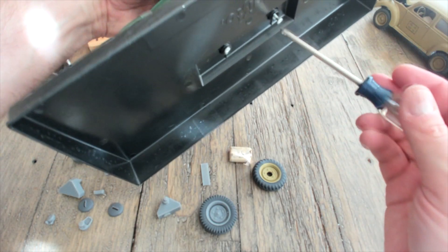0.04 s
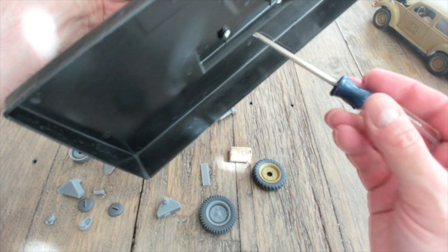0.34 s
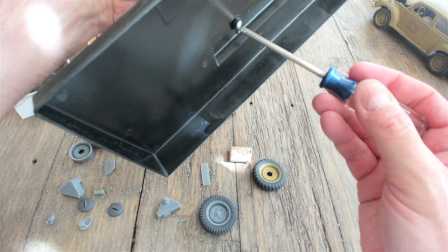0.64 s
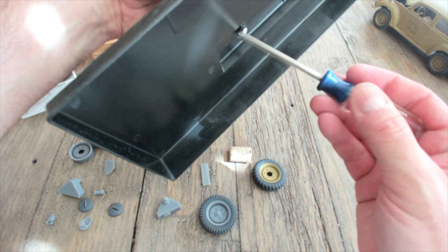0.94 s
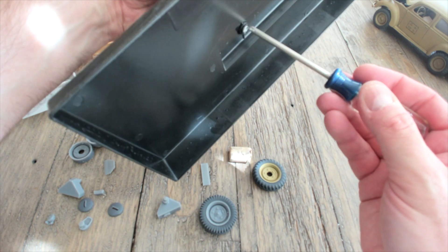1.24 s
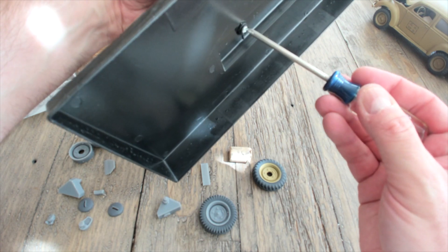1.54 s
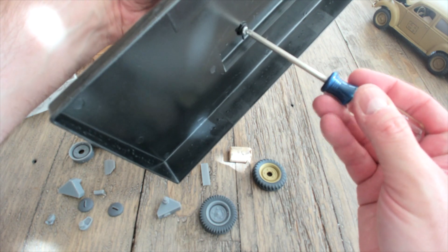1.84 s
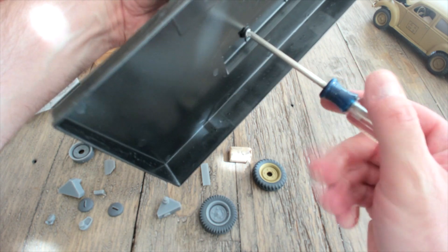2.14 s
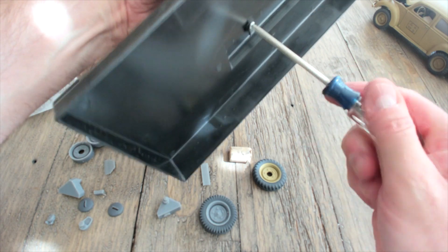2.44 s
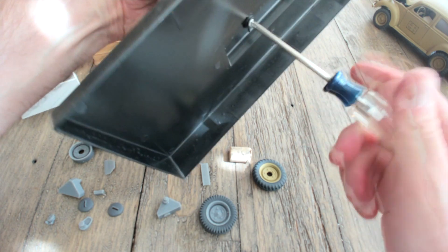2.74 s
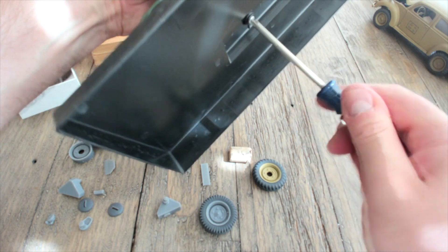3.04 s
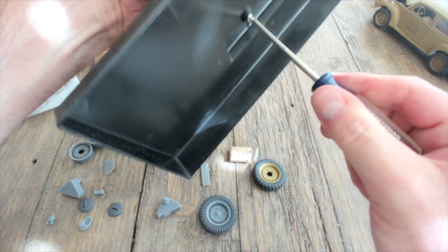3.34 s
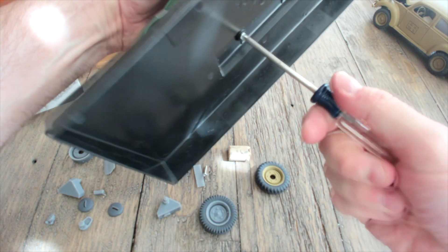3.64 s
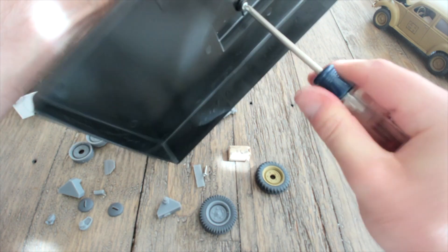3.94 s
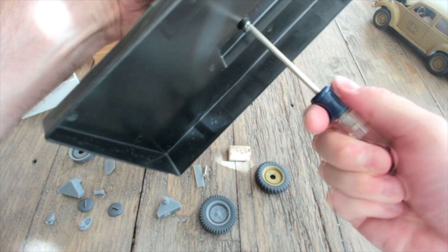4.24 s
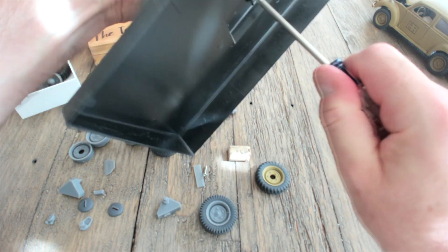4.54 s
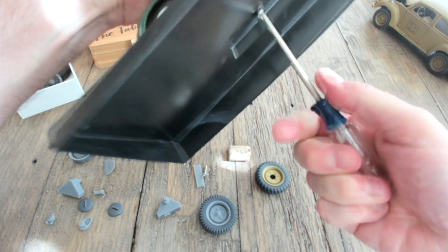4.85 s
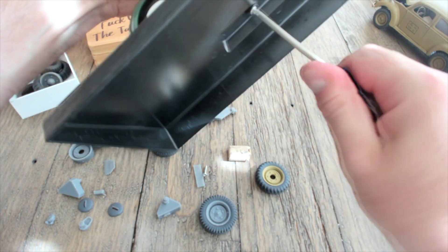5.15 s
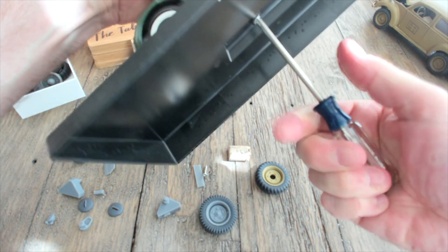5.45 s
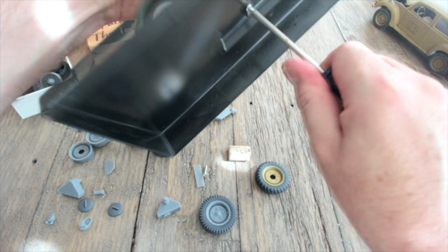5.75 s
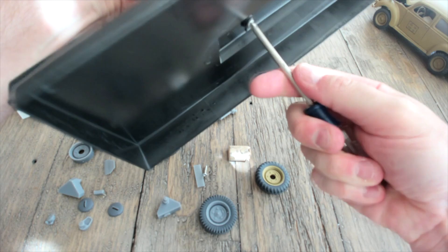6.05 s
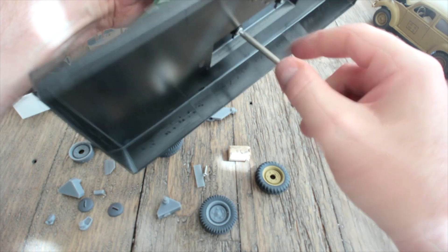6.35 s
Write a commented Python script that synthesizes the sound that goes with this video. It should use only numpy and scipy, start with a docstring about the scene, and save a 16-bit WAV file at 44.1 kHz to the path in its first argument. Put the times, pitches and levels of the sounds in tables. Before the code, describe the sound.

A small screwdriver backs a screw out of a hard plastic base, heard close in a quiet small room with slight reverberation. In the first second and a half there are faint metallic ticks and a few light, hollow plastic taps. Two firmer taps, at about 1.8 and 2.1 seconds, ring briefly in the shell. From around 2.2 seconds the screw turns, and the steel tip slips in its head with irregular small clinks and scrapes. At about 3.4 seconds the tip skids off the plastic with the sharpest click and a quick, fading rattle. From 3.8 to 5 seconds the ticks are brighter and come closer together, mixed with soft knocks and creaks as the base shifts in the hand. Lighter ticks and low, dull knocks continue until about 6.5 seconds, with one clearer ping near 6.3 seconds.

```python
"""Light ticks and hollow plastic taps sound in a small room as a screwdriver backs a screw out of a base.
The steel tip slips in the screw head and rings; it also strikes the shell and once skids off, rattling.
Held in the hand, the base creaks and knocks by stick-slip friction. A wooden table below reflects
the taps at once, the room rings on, and the recorder pushes quiet sound further down."""
import sys
import numpy as np
from scipy import signal
from scipy.fft import rfft, irfft, next_fast_len
from scipy.io import wavfile
from scipy.ndimage import uniform_filter1d

SR = 44100
rng = np.random.default_rng(int(sys.argv[2]) if len(sys.argv) > 2 else 0)


def wav_out(sig):
    """Save sig, one row per channel (or a flat mono array), as 16-bit PCM at SR to the path in sys.argv[1]."""
    wavfile.write(sys.argv[1], SR, np.round(np.clip(np.atleast_2d(sig).T, -1, 1) * 32767).astype(np.int16))


N = 286209
AGE = np.arange(SR * 4 // 25) / SR  # time since a contact began [s]
TOP_HZ = 15950
GLANCE_FREE_DB = -4.5  # a glancing blow leaves less buzz and ring

# resonances of the plastic base: (frequency [Hz], level [dB], t60 [s])
BASE_MODES = [(155, -20, .15), (258, -3, .11), (295, -2, .11), (377, -14, .11), (484, -10, .08),
              (565, -6, .08), (641, -7, .11), (790, -2, .07), (872, -3, .055), (921, -5, .11),
              (1087, -2, .045), (1230, -5, .055), (1561, -6, .07), (2051, -6, .045), (2495, -6, .07),
              (2920, -5, .07), (3150, -7, .08), (4140, -9, .055)]
# spectrum of its crowd of fast-dying modes: (frequency [Hz], level [dB])
BASE_SPECTRUM = [(60, -27), (170, -24), (270, -6.5), (390, -21.5), (900, 0), (1500, -11), (3000, 7),
                 (4700, -7), (6000, -6.5), (7500, -24.5), (11000, -14), (15000, -14.5)]


def undb(db):
    """Amplitude ratio of a level in decibels."""
    return 10 ** (np.asarray(db) / 20)


def along(points, hz):
    """Interpolation of (frequency [Hz], value) points on a logarithmic frequency axis."""
    points_hz, values = np.transpose(points)
    return np.interp(np.log(hz + 1), np.log(points_hz), values)


def colour(x, spectrum):
    """Zero-phase filtering by a (frequency [Hz], level [dB]) curve."""
    size = next_fast_len(len(x), real=True)
    gain = undb(along(spectrum, np.fft.rfftfreq(size, 1 / SR)))
    return irfft(rfft(x, size) * gain, size)[:len(x)]


def noise(spectrum, size):
    """Spectrally shaped Gaussian noise of unit rms."""
    x = colour(rng.standard_normal(size), spectrum)
    return x / x.std()


def band(x, lo_hz, hi_hz):
    """Causal band-pass filtering."""
    return signal.sosfilt(signal.butter(4, [lo_hz, hi_hz], "band", fs=SR, output="sos"), x)


def fade(t, t60):
    """Exponential damping: 60 dB of decay in t60 seconds."""
    return np.exp(-np.log(1000) * t / t60)


def add(track, start_s, x):
    """Superposition of x on the track from start_s on."""
    i = max(int(start_s * SR), 0)
    track[i:i + len(x)] += x[:max(N - i, 0)]


def ring(modes, scatter_db, detune):
    """Modal synthesis: damped sines whose shares and pitch vary with the spot struck and the grip."""
    hz, db, t60 = np.transpose(modes)[:, :, None]
    share, shift, phase = rng.standard_normal((3, len(modes), 1))
    waves = np.sin(2 * np.pi * (hz * (1 + detune * shift) * AGE + phase))
    return np.sum(undb(db + scatter_db * share) * fade(AGE, t60) * waves, axis=0)


def judder(rate_hz, rough_db):
    """Stick-slip modulation: a gain that jumps to a new random level rate_hz times a second."""
    hold = max(int(SR / rate_hz), 2)
    steps = np.repeat(undb(rough_db * rng.standard_normal(len(AGE) // hold + 1)), hold)
    return uniform_filter1d(steps, hold // 2 + 1)[:len(AGE)]


def excite_bands(x, edges_hz, levels_db):
    """Excitation spectrum: force and hardness of a contact set each band's level over the attack."""
    attack = int(0.012 * SR)
    parts = [band(x, lo, hi) for lo, hi in zip(edges_hz, edges_hz[1:])]
    return sum(part * undb(db) / part[:attack].std() for part, db in zip(parts, levels_db))


def air(level_db=-76.5):
    """Ambient noise floor: the steady hush of the room."""
    # spectrum of the quiet air: (frequency [Hz], level [dB])
    air_spectrum = [(30, -17), (100, -10.5), (180, -11), (280, -3), (600, -11), (1500, -14.5), (3000, -11),
                    (6000, -18.5), (9000, -22), (16000, -20.5)]
    return undb(level_db) * noise(air_spectrum, N)


def room(x, build_s=0.0073, wall_s=0.072, wall_width_s=0.018, wall_gain=0.38):
    """Reverberation: a diffuse field builds up, swells as the far wall answers and decays band by band."""
    # spectrum of the diffuse field: (frequency [Hz], level [dB])
    room_spectrum = [(100, -13.5), (300, -5), (900, -2), (1400, -1.5), (2700, -1.5), (5500, -5),
                     (7500, -14), (14000, 3), (16500, -8)]
    # reverberation time: (frequency [Hz], t60 [s])
    decay_times = [(150, 0.59), (1000, 0.46), (3000, 0.55), (5500, 0.55), (8000, 0.44), (15000, 0.047)]
    t = np.arange(SR) / SR
    edges_hz = np.geomspace(80, 17000, 11)
    diffuse = noise(room_spectrum, len(t))
    tail = sum(band(diffuse, lo, hi) * fade(t, along(decay_times, np.sqrt(lo * hi)))
               for lo, hi in zip(edges_hz, edges_hz[1:]))
    build_up = 1 - np.exp(-(t / build_s) ** 2)
    wall_swell = 1 + wall_gain * np.exp(-((t - wall_s) / wall_width_s) ** 2)
    response = tail * build_up * wall_swell
    return signal.fftconvolve(x, response / np.sqrt(np.sum(response ** 2)))[:N]


def table_reflection(x, lag_s=0.0044, db=-9):
    """Comb filtering: the direct sound interferes with its echo from the table top."""
    return x + undb(db) * np.pad(x, (int(lag_s * SR), 0))[:len(x)]


def scattered(start_s, end_s, spread_db, count):
    """Jittered timing: one event in each of count equal slots, as (time [s], level offset [dB])."""
    place, size = rng.random((count, 2)).T
    times = start_s + (end_s - start_s) * (np.arange(count) + place) / count
    return zip(times, spread_db * (2 * size - 1))


def grip_and_thread(turning_s=(2.2, 6.4), thread_db=-72):
    """Intermittent friction: the grip shifts and the thread catches faintly while the screw turns."""
    # bass of the shifting grip: (time [s], level [dB])
    grip_levels = [(2.2, -81), (2.77, -83), (3.52, -66.5), (3.69, -73), (4.46, -76.5), (4.95, -55),
                   (5.54, -78.5), (6.34, -67), (6.48, -56)]
    for s, offset_db in scattered(*turning_s, spread_db=6.5, count=26):
        db = np.interp(s, *np.transpose(grip_levels)) + offset_db
        yield s, knock([db, db - 7, db - 13]), 0
    for s, offset_db in scattered(*turning_s, spread_db=5, count=24):
        db = thread_db + offset_db
        yield s, tap([db - 11, db - 11, db, db - 2], GLANCE_FREE_DB), 0


def knock(levels_db, rub_t60=0.045, ring_db=-11, rise_s=0.0016):
    """Stick-slip friction: the plastic gives way in jerks, and the soft push favours its low modes."""
    # edges of the thump, shell and hiss bands: (frequency [Hz])
    edges_hz = [100, 600, 1800, 7000]
    soft_push = [(150, 4), (300, 3), (800, -4), (2000, -8.5), (5000, -11.5)]  # (frequency [Hz], gain [dB])
    rub = noise(BASE_SPECTRUM, len(AGE)) * fade(AGE, rub_t60) * judder(rate_hz=370, rough_db=3.5)
    body = undb(ring_db) * colour(ring(BASE_MODES, scatter_db=4.5, detune=0.036), soft_push)
    onset = 1 - np.exp(-AGE / rise_s)
    return excite_bands((rub + body) * onset, edges_hz, levels_db)


def knocks(hiss_db=-12):
    """Release of static friction: the base shifts under hand and tip."""
    # shifts of the base: (time [s], shell level [dB], thump re shell [dB])
    shifts = [(0.8769, -42.5, -18), (0.995, -50.5, -32), (1.274, -50, -30), (1.595, -59, -26),
              (1.8058, -43, -11), (1.817, -42.5, -7), (2.057, -43, -10), (2.2955, -62.5, -13),
              (2.5727, -46, -24), (2.719, -47, -11), (3.0548, -40, -2.5), (3.0849, -41, -3.5),
              (3.5671, -37, -4), (3.6455, -52, 4.5), (4.01, -37.5, -10), (4.491, -47, 0.5),
              (4.527, -45, -3), (4.6894, -38.5, 2), (4.7906, -47.5, 1.5), (4.86, -52, 3), (4.9132, -43, 5),
              (5.0129, -42, 3.5), (5.0639, -43, -3), (5.0995, -48, 4.5), (5.2164, -48.5, 3.5),
              (5.2985, -45.5, -2), (5.6411, -78, 17), (5.6723, -53.5, -1), (5.785, -46, -10.5),
              (6.0056, -41, -2.5), (6.079, -69, 17), (6.12, -56.5, 2.5), (6.2665, -53.5, 8.5),
              (6.2994, -43.5, -1.5), (6.3454, -56.5, 9.5), (6.3714, -41, -6), (6.4043, -50.5, 4),
              (6.4719, -58.5, 13)]
    for s, db, thump_db in shifts:
        yield s, knock([db + thump_db, db, db + hiss_db]), 0


def panels(count=24, rise_s=0.00098):
    """Beating: the hardest blows leave clusters of close panel modes interfering as they decay."""
    # mode clusters: (time [s], centre [Hz], width [Hz], level [dB], t60 [s])
    clusters = [(1.808, 1720, 630, -36, 0.38), (1.811, 3380, 950, -37.5, 0.47),
                (1.81, 5950, 1000, -56, 0.7), (2.069, 925, 120, -47.5, .6),
                (3.153, 3000, 345, -26.5, 0.072), (3.3579, 425, 90, -39.5, .28),
                (3.357, 2352, 402, -21.5, 0.1), (3.3574, 10740, 900, -27, .035)]
    t = np.arange(SR // 2) / SR
    onset = 1 - np.exp(-t / rise_s)
    track = np.zeros(N)
    for s, centre_hz, width_hz, db, t60 in clusters:
        jitter, phase = rng.random((2, count, 1))
        place = (np.arange(count)[:, None] + jitter) / count
        modes_hz = centre_hz + width_hz * (place - 0.5)
        cluster = np.sin(2 * np.pi * (modes_hz * t + phase)).sum(axis=0)
        add(track, s, undb(db) * cluster / cluster.std() * fade(t, t60) * onset)
    return track


def tap(levels_db, free_db, crack_t60=0.0087, buzz_db=-13, buzz_t60=0.085, ring_db=-19):
    """Impact excitation: the shell cracks, then buzzes and rings in free vibration scaled by free_db."""
    # edges of the thump, shell, crack and sparkle bands: (frequency [Hz])
    edges_hz = [120, 600, 1800, 7000, 16500]
    buzz = undb(buzz_db + free_db) * fade(AGE, buzz_t60) * judder(rate_hz=330, rough_db=3.5)
    shell = noise(BASE_SPECTRUM, len(AGE)) * (fade(AGE, crack_t60) + buzz)
    modes = undb(ring_db + free_db) * ring(BASE_MODES, scatter_db=5, detune=0.01)
    blow = band(shell + modes, 290, TOP_HZ)  # the taps carry little sound below about 290 Hz
    return excite_bands(table_reflection(blow), edges_hz, levels_db)


def taps(thump_db=-11, crack_db=1.5, crack_share=0.3):
    """Contact stiffness: a harder blow of the tip lifts the sparkle fully and the crack by a share."""
    # blows on the plastic: (time [s], shell level [dB], hardness [dB], free vibration and room [dB])
    blows = [(0.5125, -31.5, -24.5, -5.5), (0.8039, -33.5, -11.5, -3.5), (0.816, -35, -36.5, -2.5),
             (0.8885, -32.5, -46.5, -1), (1.196, -34, -6, -4), (1.6318, -38.5, -20, -7),
             (1.8101, -26, 3.5, -3.5), (2.0684, -25.5, -9.5, -2.5), (2.7244, -34.5, -1.5, -1),
             (3.072, -28.5, -45, -4), (3.3587, -35, 16, -8.5), (4.0167, -32.5, -7, 1.5)]
    for s, db, hard_db, free_db in blows:
        shape_db = np.array([thump_db, 0, crack_db + crack_share * hard_db, hard_db])
        yield s, tap(db + shape_db, free_db), free_db


def skid(chatter_s=3.3955, chatter_db=-26, bounce_s=0.017, loss_db=4.5):
    """Inelastic rebound: the tip glances off the plastic and chatters on, each bounce weaker."""
    # glancing blows: (time [s], crack level [dB])
    glances = [(3.151, -24), (3.3588, -17.5), (3.385, -29.5)]
    bounces = [(chatter_s + k * bounce_s, chatter_db - k * loss_db) for k in range(6)]
    shape_db = np.array([-28.5, -17.5, 0, -19.5])  # thump, shell, crack, sparkle
    for s, db in glances + bounces:
        yield s, tap(db + shape_db, GLANCE_FREE_DB), GLANCE_FREE_DB


def tick(levels_db, ping_db, slip_s=0.0033, slip_t60=0.028, buzz_db=-16, buzz_t60=0.21, rise_s=0.00039):
    """Frictional excitation: the tip scrapes over the edge of its slot and sets the steel ringing."""
    # crowd of fast-dying steel modes: (frequency [Hz], level [dB])
    steel_spectrum = [(100, -41.5), (280, -12.5), (600, -18.5), (950, -4), (1400, -17), (2100, 1.5),
                      (3200, 10.5), (5200, 2.5), (7000, -14), (9500, -10), (12000, -8.5), (14500, 2.5),
                      (16500, -4)]
    # screw and blade pressed together: (frequency [Hz], level [dB], t60 [s])
    steel_modes = [(2090, -19, .07), (2480, -8, .1), (3230, -12, .08), (4125, -12, .06), (4696, -10, .23),
                   (8600, -22, .13), (11000, -15, .13), (11870, -9, .06), (14000, -7, .08),
                   (14580, -11, .05)]
    # free shaft, which pings as the tip springs clear: (frequency [Hz], level [dB], t60 [s])
    shaft_modes = [(4696, -23, .25), (5655, 0, .075), (5730, -6, .06), (11870, -7, .05)]
    # edges of the body, clink and treble bands: (frequency [Hz])
    edges_hz = [120, 1800, 7000, 16500]
    slip = fade(np.maximum(AGE - slip_s, 0), slip_t60) * judder(rate_hz=970, rough_db=1.5)
    buzz = undb(buzz_db) * fade(AGE, buzz_t60)
    scrape = noise(steel_spectrum, len(AGE)) * (slip + buzz)
    steel = undb(-8.5) * ring(steel_modes, scatter_db=3.5, detune=0.00084)
    ping = undb(ping_db) * ring(shaft_modes, scatter_db=5, detune=0.0015)
    onset = 1 - np.exp(-AGE / rise_s)
    return excite_bands((scrape + steel) * onset, edges_hz, levels_db) + ping * onset


def ticks(body_db=-7.5, shaft_db=8.5):
    """Structure-borne sound: each slip clinks in the screw head, and the screw passes some to the base."""
    # slips: (time [s], clink level [dB], treble re clink [dB], ping offset [dB], room offset [dB])
    slips = [(0.202, -57, -28, -13.5, -8), (0.4051, -50.5, -10, -4, -10), (0.927, -52.5, -23, -13, -1),
             (2.1382, -39.5, -3.5, -17, 3.5), (2.443, -46, 10, -6, -1), (2.4844, -37.5, 1, -7, 1.5),
             (2.5724, -38.5, 1, -27, -9), (2.8733, -37, -3, -10, -3), (3.0161, -43.5, -13, -16, 7),
             (3.057, -41.5, -12.5, -24, 12), (3.1188, -35.5, -1.5, -10, 5), (3.2185, -29.5, 4.5, -8, 1.5),
             (3.5147, -43, -5, -16, 1.5), (3.8478, -34, 8.5, -23, 1), (3.8916, -35.5, 3, -6.5, 2),
             (4.0213, -31, 2.5, -7, 0), (4.102, -44, -22, -20, 0), (4.27, -44.5, -1.5, -8, -0.5),
             (4.3365, -67, 10, -12.5, 1.5), (4.4255, -32.5, 2, -18, 0.5), (4.5505, -30, -0.5, -12.5, 1),
             (4.6897, -39, -3, -16, 1), (4.7103, -27, 1.5, -10, -1.5), (4.8174, -28.5, 5.5, -8, 3),
             (4.9382, -30.5, 5.5, -12, 3), (5.013, -46, -18, -17, -2), (5.0445, -47, -9, -18, -2),
             (5.2552, -38.5, 0, -5.5, -1.5), (5.3668, -44, -2.5, -2.5, -3.5),
             (5.4616, -41, -4.5, -19.5, -3), (5.5217, -51, -15.5, -25.5, 2.5),
             (5.6723, -37, -10, -16, -1.5), (5.7015, -49, -10, -5.5, -16), (5.785, -42, -10, -7.5, -3),
             (5.8828, -45, -7, 0, -3.5), (5.926, -41, -15, -18, -2), (6.0171, -38.5, -0.5, -9.5, -2),
             (6.1015, -56, 1, -15, 1), (6.165, -51, -23, -25, -2), (6.2207, -65, -3, 7, 2.5),
             (6.324, -34, 3, 4, 1.5), (6.4042, -45.5, -7, -0.5, -7)]
    for s, db, treble_db, ping_db, room_db in slips:
        yield s, tick([db + body_db, db, db + treble_db], db + ping_db + shaft_db), room_db


def scene():
    """Superposition of the direct sound, its reverberation and the quiet air."""
    # (contacts, gain [dB], room re direct [dB]); each contact is (time [s], sound, room offset [dB])
    layers = [(ticks(), -3, -17), (taps(), -1, -17), (skid(), -1, -17),
              (knocks(), 0, -19), (grip_and_thread(), 1.5, -19)]
    direct, to_room = np.zeros((2, N))
    for contacts, gain_db, room_db in layers:
        for s, sound, offset_db in contacts:
            add(direct, s, sound * undb(gain_db))
            add(to_room, s, sound * undb(gain_db + room_db + offset_db))
    return (direct + panels() + room(to_room) + air())[None]


def suppress(x, threshold_db=-90, depth_db=-9, frame=512):
    """Spectral gating: each band is turned down smoothly as its level sinks past the threshold."""
    spectra = signal.stft(x, nperseg=frame)[2]
    power = uniform_filter1d(np.abs(spectra) ** 2, size=9, axis=-2)
    opening = power / (power + undb(threshold_db) ** 2)
    return signal.istft(spectra * undb(depth_db * (1 - opening)), nperseg=frame)[1][:, :N]


def record(dry):
    """Band limiting: the recorder gates faint noise, clips at full scale and cuts the top."""
    lowpass = signal.ellip(8, 0.2, 70, TOP_HZ, fs=SR, output="sos")
    return signal.sosfilt(lowpass, np.clip(suppress(dry), -1, 1))


dry = scene()
out = record(dry)
wav_out(out)
```